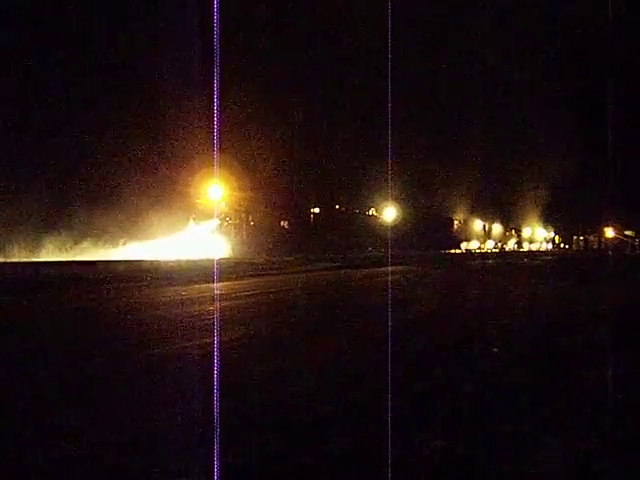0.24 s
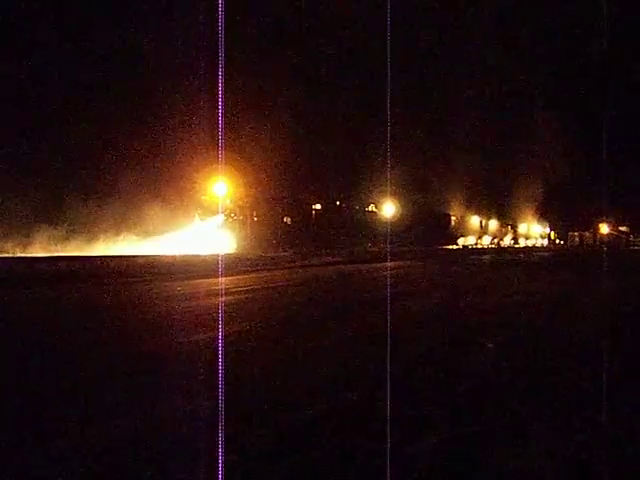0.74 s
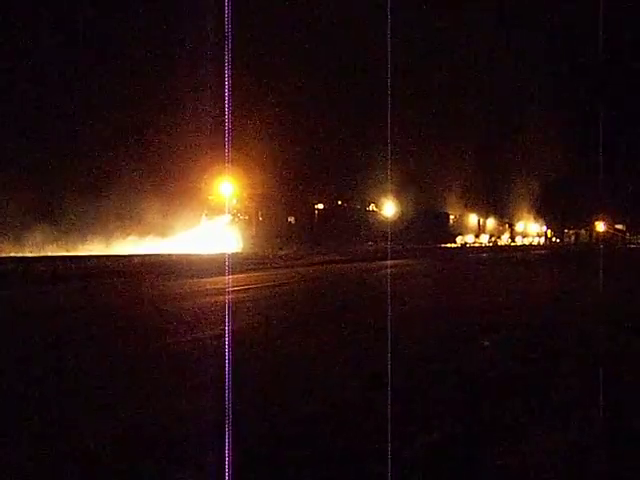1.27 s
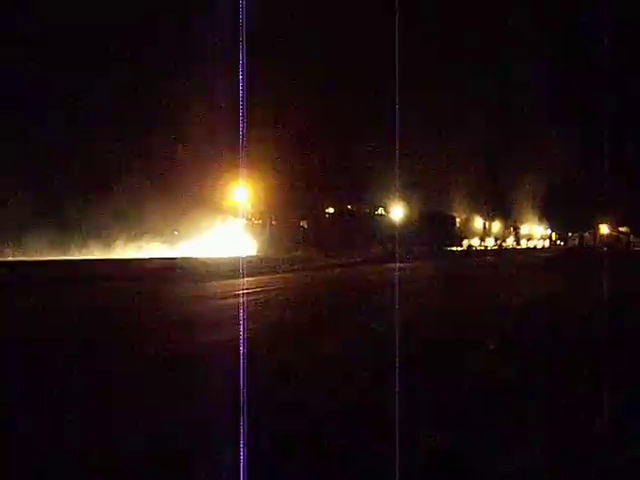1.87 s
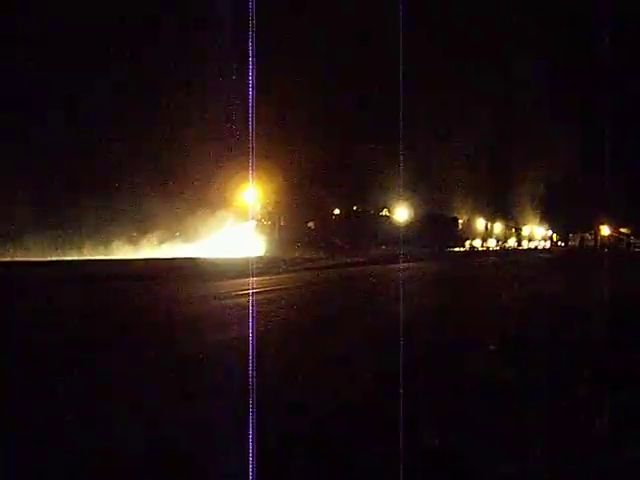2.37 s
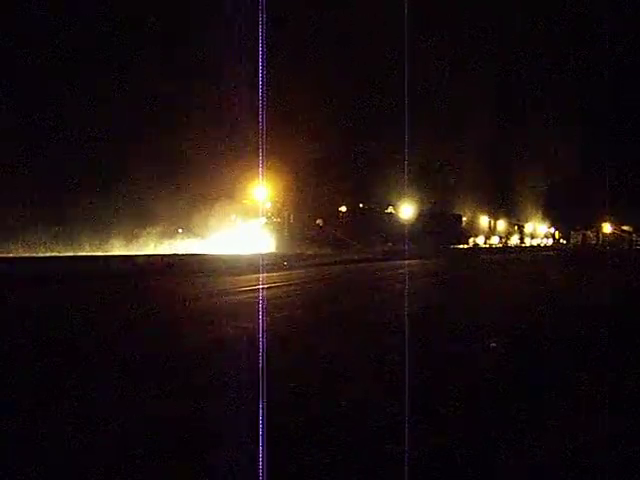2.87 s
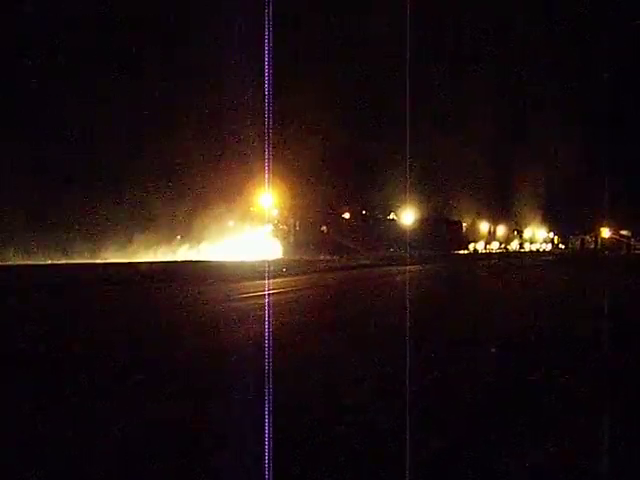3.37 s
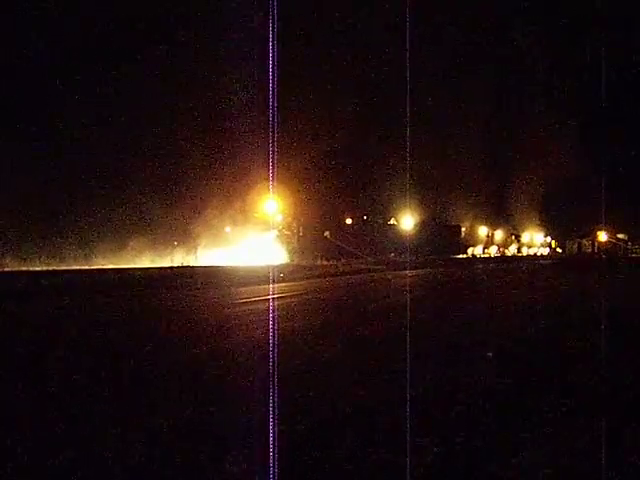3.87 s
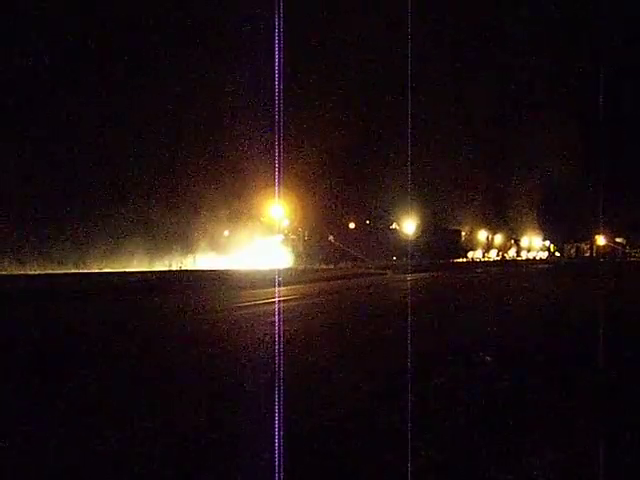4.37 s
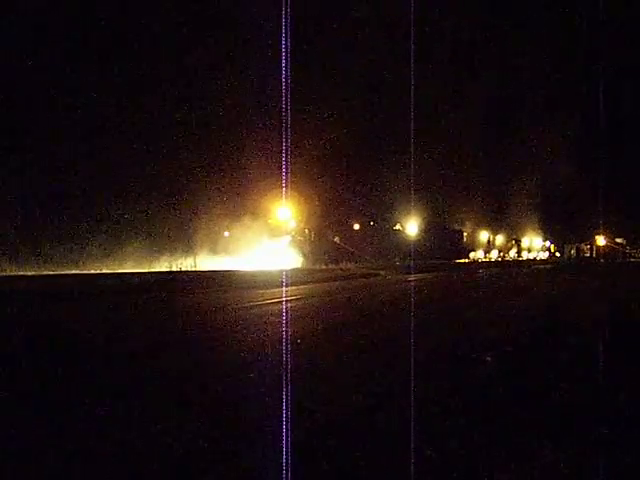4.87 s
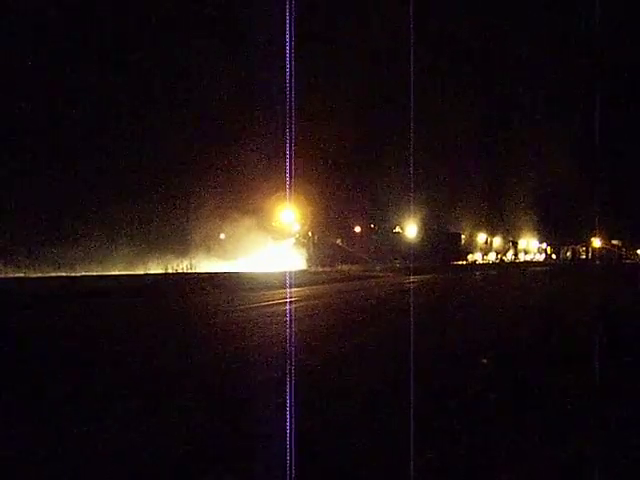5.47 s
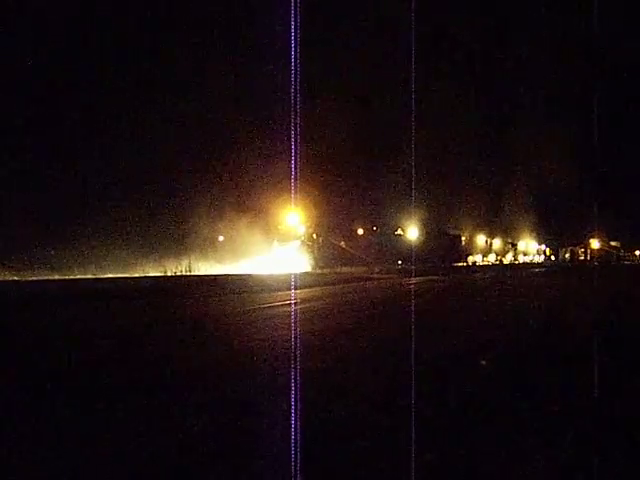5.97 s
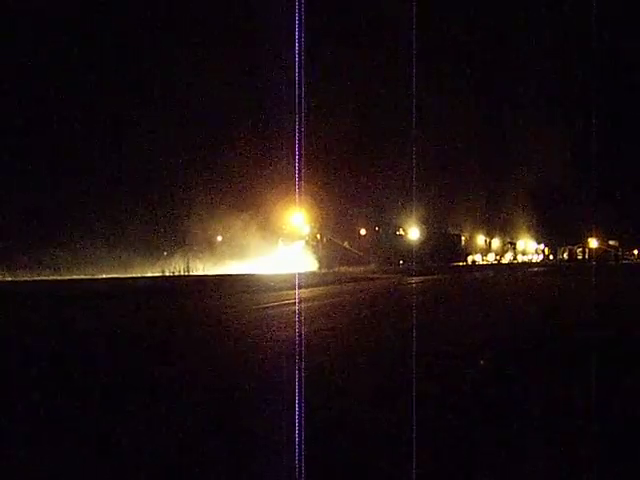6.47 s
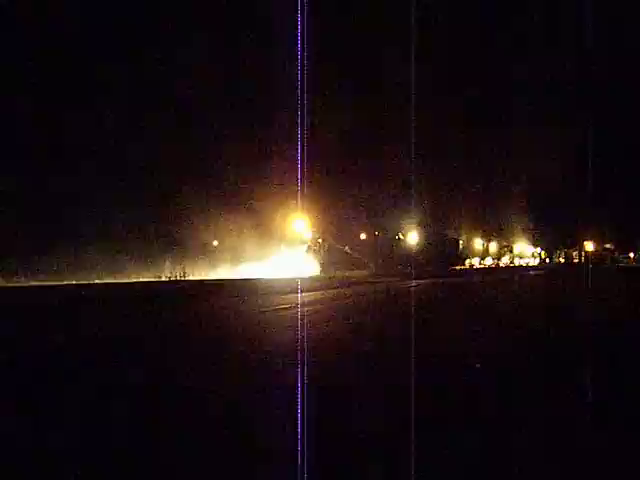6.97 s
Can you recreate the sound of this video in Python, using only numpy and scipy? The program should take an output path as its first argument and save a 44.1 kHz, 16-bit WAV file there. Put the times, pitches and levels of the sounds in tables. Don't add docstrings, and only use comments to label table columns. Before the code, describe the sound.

From 0 to about 7.2 seconds, a rail grinding train works without pause in the open at night, roughly a hundred metres away and creeping farther off. A dense, abrasive roar of many spinning stones on steel dominates the middle range, noisy and rough, with a buzzing rasp repeating at each stone's fast rotation and slight irregular flutter. Sparks and grit add a thin steady hiss. Underneath lie deep rumble and a low diesel generator drone near 90 hertz, with neighbouring hums slowly beating. The start is marginally fuller; the low hum weakens around 3.4 to 4.3 seconds, and the rumble and hiss dip slightly near 4.1. The drone partly returns, sinks again around 6, then swells by the end, while grinding and hiss keep gently fading. The small microphone sounds slightly hollow in the treble, with the very top missing.

```python
import sys
import numpy as np
from scipy import signal
from scipy.fft import rfft, irfft
from scipy.io import wavfile

SR = 44100
rng = np.random.default_rng(int(sys.argv[2]) if len(sys.argv) > 2 else 0)


def volts_from_decibels(level):
    exponent = np.asarray(level, float) / 20
    return 10 ** exponent


def transcribe(signal):
    frames = np.atleast_2d(signal).T
    limited = np.clip(frames, -1, 1)
    pcm = np.round(limited * 32767).astype(np.int16)
    wavfile.write(sys.argv[1], SR, pcm)


N = 319284
TIME = np.arange(N) / SR
HZ = np.maximum(np.arange(N // 2 + 1) * SR / N, 1)


def rms_one(x):
    return x / np.sqrt(np.mean(x ** 2) + 1e-20)


def at_hz(points, hz):
    point_hz, db = np.transpose(points)
    return np.interp(np.log(hz), np.log(point_hz), db, left=-90, right=-90)


def drift(rate_hz):
    hop = 100
    pole = np.exp(-2 * np.pi * rate_hz * hop / SR)
    noise = rng.standard_normal(N // hop + 1002)
    slow = signal.lfilter([1], [1, -2 * pole, pole * pole], noise)[1000:]
    return np.interp(np.arange(N) / hop, np.arange(len(slow)), rms_one(slow - slow.mean()))


def patch(at_s, width_s):
    return np.exp(-((TIME - at_s) / width_s) ** 2)


def beat(share_db, beats_per_s, swell_s):
    return np.abs(1 + volts_from_decibels(share_db) * np.exp(2j * np.pi * beats_per_s * (TIME - swell_s)))


def tone(hz, wobble_db, sway):
    phase = 2 * np.pi * (hz * TIME + rng.random()) + sway * drift(0.52)
    return np.sqrt(2) * volts_from_decibels(wobble_db * drift(0.92)) * np.sin(phase)


def coloured(spectrum, patchy_db, rate_hz):
    shaped = rfft(rng.standard_normal(N)) * volts_from_decibels(at_hz(spectrum, HZ))
    third_octave = 3 * np.log2(HZ)
    together = drift(rate_hz)
    lowest = int(3 * np.log2(spectrum[0][0]))
    highest = int(3 * np.log2(spectrum[-1][0]))
    out = 0
    for band in range(lowest, highest + 2, 2):
        share = np.cos(np.pi / 4 * np.clip(third_octave - band, -2, 2)) ** 2
        flicker_db = patchy_db * (0.36 * together + drift(rate_hz))
        out = out + volts_from_decibels(flicker_db) * irfft(shaped * share, N)
    return rms_one(out)


def stones(body, memory):
    rasp = 0
    for turn_hz in STONE_TURNS_HZ:
        repeat = 1 / (1 - memory * np.exp(-2j * np.pi * HZ / turn_hz))
        contact = rng.standard_normal(N) * volts_from_decibels(1.5 * drift(1.5))
        rasp = rasp + rfft(contact) * repeat
    return rms_one(irfft(rasp * volts_from_decibels(at_hz(body, HZ)), N))


def layer_db(start_db, loss_db_per_s, surge_db, dust_db):
    surge = surge_db * np.exp(-TIME / 0.3)
    dust = dust_db * patch(at_s=4.1, width_s=0.35)
    return start_db - loss_db_per_s * TIME + surge - dust


# multiple of the cycle, level/dB, second set below it/dB, swell/s
STRONG_ORDERS = [(2, -32.5, -15.5, 0.92), (3, -37.5, -11, 0.22), (5, -39.5, -13.5, 1)]
# t/s, level/dB
FIRING_TONE = [(0, -24.5), (1.2, -25), (1.9, -28), (2.6, -27), (3.0, -26.5), (3.4, -31), (3.8, -31),
               (4.3, -32), (4.7, -29), (5.5, -30), (6.0, -35), (6.5, -33.5), (7.24, -28.5)]
# multiple of the cycle, level/dB
LESSER_ORDERS = [(1, -60.6), (4, -42.7), (7, -48.4), (9, -51.6), (10, -52.7), (11, -53.7), (13, -57.8),
                 (14, -50.1), (15, -54.7), (16, -57.1), (17, -52.2), (18, -55.8), (19, -57.8), (20, -52.7),
                 (21, -62.0), (22, -60.1), (23, -51.2), (24, -54.0), (25, -62.8), (26, -50.1)]
# multiple of the cycle, level/dB
CLATTER_ORDERS = [(34, -58.2), (35, -57.7), (36, -59.5), (38, -58.2), (41, -54.6), (42, -52.7), (45, -57.6),
                  (46, -50.5), (47, -57.0), (48, -58.8), (49, -59.1), (50, -56.2), (51, -56.6), (52, -54.4),
                  (53, -57.7), (54, -55.9), (55, -58.0), (60, -61.5), (62, -60.1), (66, -61.3), (67, -61.6),
                  (70, -60.5), (71, -59.8), (73, -58.9), (77, -58.9), (80, -58.8), (88, -59.2), (90, -56.9),
                  (93, -60.5), (97, -61.4)]


def engines():
    cycle_hz, second_cycle_hz = 14.939, 15.131
    slip_hz = second_cycle_hz - cycle_hz
    recede_db = -0.43 * TIME

    out = 0
    for order, db, second_db, swell_s in STRONG_ORDERS:
        gain = volts_from_decibels(db + recede_db) * beat(second_db, round(order) * slip_hz, swell_s)
        out = out + gain * tone(round(order) * cycle_hz, wobble_db=0.0, sway=0.33)

    firing_db = np.interp(TIME, *np.transpose(FIRING_TONE))
    second_below_db = -41.5 + recede_db - firing_db
    firing_gain = volts_from_decibels(firing_db) * beat(second_below_db, 6 * slip_hz, swell_s=0.35)
    out = out + firing_gain * tone(6 * cycle_hz, wobble_db=-0.24, sway=0.25)

    for order, db in LESSER_ORDERS:
        out = out + volts_from_decibels(db - 1.0) * tone(order * cycle_hz, wobble_db=3.0, sway=0.35)
    for order, db in CLATTER_ORDERS:
        out = out + volts_from_decibels(db + 0.2) * tone(order * cycle_hz, wobble_db=3.0, sway=0.84)
    return out


# f/Hz, level per Hz/dB
RUMBLE_SPECTRUM = [(5, -30), (22, -6), (40, 2), (70, -1), (105, -4.5), (160, -8.5), (320, -9), (400, -15),
                   (450, -19.5), (600, -31.5)]


def rumble():
    db = layer_db(start_db=-35.5, loss_db_per_s=0.32, surge_db=1.2, dust_db=1.5)
    return volts_from_decibels(db + 4) * coloured(RUMBLE_SPECTRUM, patchy_db=0.04, rate_hz=3.5)


STONE_TURNS_HZ = (59.36, 59.41, 59.45, 59.52, 59.72)
# f/Hz, level per Hz/dB
ROAR_SPECTRUM = [(380, -30), (480, -9.5), (560, -3), (650, 0), (770, -1.5), (850, -6), (960, -7.5),
                 (1300, -23)]
# f/Hz, level per Hz/dB
RASP_BAND = [(450, -22), (540, -10.5), (590, -3.5), (650, -7), (715, -6), (772, -2.5), (830, -5),
             (890, -7.5), (1000, -25)]


def roar():
    db = layer_db(start_db=-33.5, loss_db_per_s=0.3, surge_db=0.5, dust_db=0.5)
    broad = volts_from_decibels(db - 2.0) * coloured(ROAR_SPECTRUM, patchy_db=0.55, rate_hz=4.7)
    return broad + volts_from_decibels(db - 6) * stones(RASP_BAND, memory=0.57)


# f/Hz, level per Hz/dB
GRIND_SPECTRUM = [(700, -26.5), (950, -4.5), (1200, -2), (1500, -2), (1900, -1.5), (2500, -1.5),
                  (2700, -4.5), (3000, -6.5), (3600, -9), (4500, -24.5)]
# f/Hz, level per Hz/dB
RAIL_MODES = [(1000, -21), (1400, -7.5), (1650, -2), (1800, -0.5), (2050, -1), (2150, -4.5), (2210, -12),
              (2300, -24)]


def grind():
    db = layer_db(start_db=-32.5, loss_db_per_s=0.2, surge_db=0.4, dust_db=0.1)
    tearing = volts_from_decibels(db - 0.16) * coloured(GRIND_SPECTRUM, patchy_db=0.59, rate_hz=7.8)
    return tearing + volts_from_decibels(db - 7.5) * stones(RAIL_MODES, memory=0.84)


# f/Hz, level per Hz/dB
HISS_SPECTRUM = [(3200, -22), (4400, 1), (5500, -0.5), (6500, -0.5), (7200, -0.5), (7500, -3), (8000, -3.5),
                 (8800, -5.5)]


def hiss():
    db = layer_db(start_db=-46, loss_db_per_s=0.37, surge_db=-0.2, dust_db=1.2)
    return volts_from_decibels(db + 2.5) * coloured(HISS_SPECTRUM, patchy_db=0.25, rate_hz=9.9)


# f/Hz, level/dB
MOTOR_TONES = [(57.11, -43.4), (136.71, -50.4), (142.44, -54.9), (237.81, -57.4), (352.38, -58.5),
               (410.19, -61.2), (441.95, -64.6), (469.3, -58.8)]
# f/Hz, level/dB, neighbour below it/dB, beats per s/Hz, swell/s
HUM_PAIRS = [(119.4, -41, -6.5, 0.615, 1.5), (179.6, -44.5, -8, 0.902, 0.03),
             (273.8, -47, -11.5, 0.39, 0.35), (357.2, -42, -22.5, 0.42, 1.1)]
# t/s, width/s, level/dB
HUM_PATCHES = [
    (3.8, 0.4, -5),
    (4.2, 0.5, 4),
    (3.8, 0.3, -5),
    (4.87, 0.7, -7.5),
]


def auxiliaries():
    out = 0
    for hz, db in MOTOR_TONES:
        out = out + volts_from_decibels(db + 2.5) * tone(hz, wobble_db=2.5, sway=0.5)
    for (hz, db, *neighbour), (at_s, width_s, patch_db) in zip(HUM_PAIRS, HUM_PATCHES):
        hum_db = db - 0.11 * TIME + patch_db * patch(at_s, width_s)
        out = out + volts_from_decibels(hum_db) * beat(*neighbour) * tone(hz, wobble_db=0.53, sway=0.33)
    return out


def scene():
    train = engines() + rumble() + roar() + grind() + hiss() + auxiliaries()
    return train[None]


def roll_off(x):
    return signal.sosfilt(signal.butter(12, 9030, fs=SR, output="sos"), x)


# f/Hz, level/dB
ROLL_OFF = [(7000, 0), (7500, 1.5), (7800, -2.5), (8000, -5), (8200, -7.5), (8500, -14), (8800, -26),
            (9000, -36.5), (9150, -49.5)]


def record(dry):
    dip_hz, null_hz, skirt_hz = 4177, 180, 1670
    converter_hz, clock_tone_hz = 16000, 7990

    off_centre = (HZ ** 2 - dip_hz ** 2) / HZ
    heard = rfft(dry[0]) * (off_centre - 1j * null_hz) / (off_centre - 1j * skirt_hz)
    heard += rfft(volts_from_decibels(-70.5) * np.sin(2 * np.pi * clock_tone_hz * TIME))

    edge = round(converter_hz / 2 * N / SR)
    heard[edge:2 * edge] = np.conj(heard[edge:0:-1])
    heard *= np.where(HZ < ROLL_OFF[0][0], 1, volts_from_decibels(at_hz(ROLL_OFF, HZ)))
    mix = irfft(heard, N)[None]
    return roll_off(mix)


dry = scene()
out = record(dry)
transcribe(out)
```